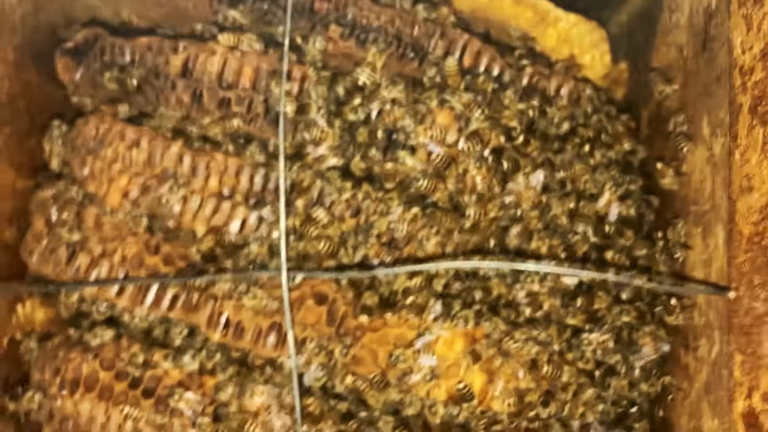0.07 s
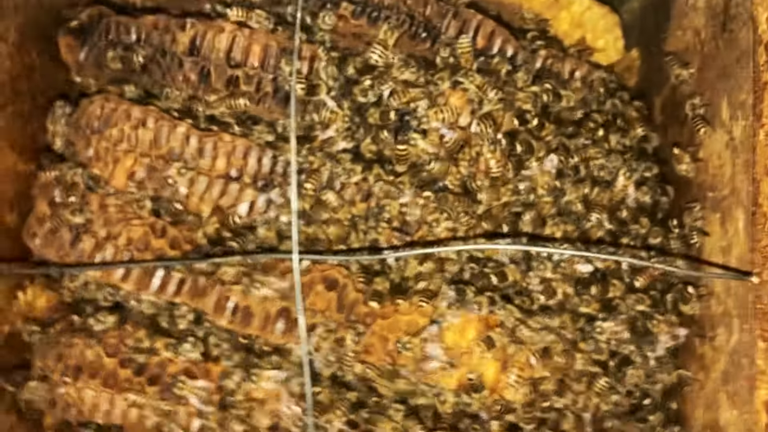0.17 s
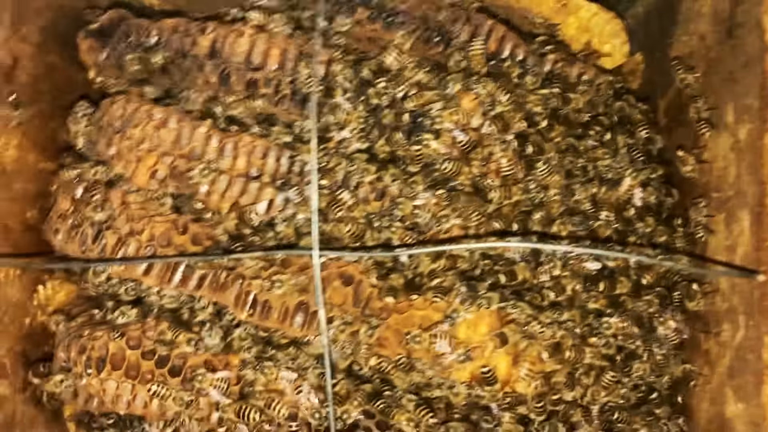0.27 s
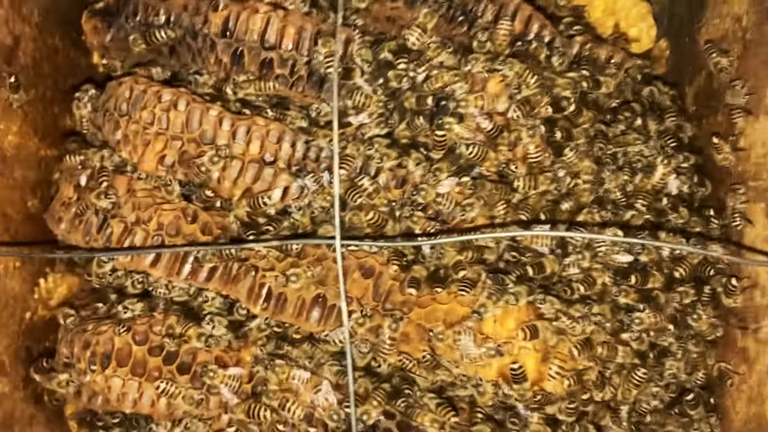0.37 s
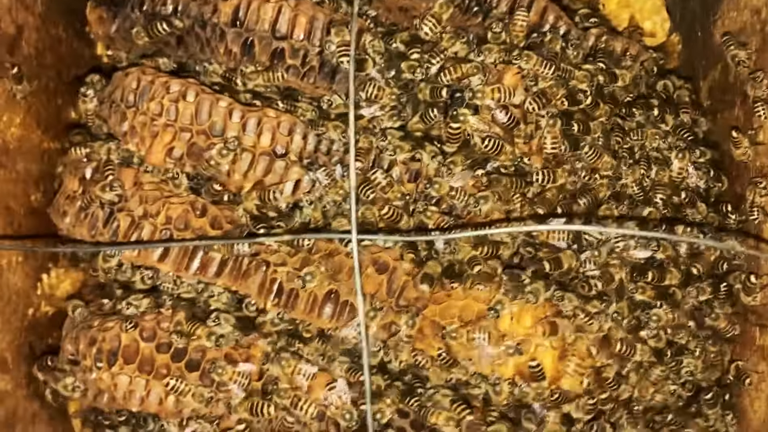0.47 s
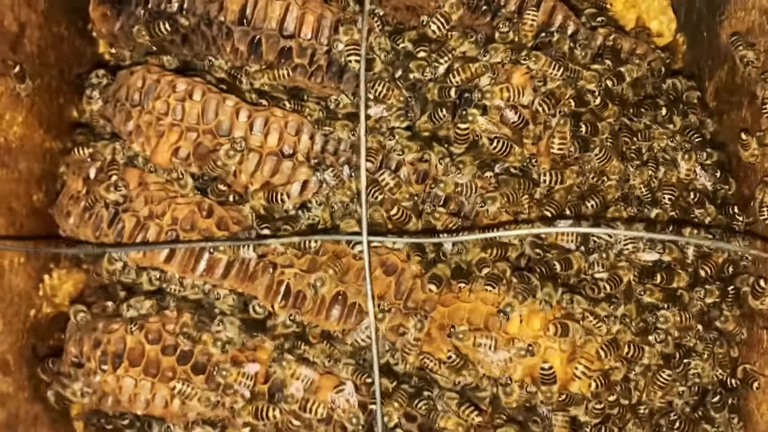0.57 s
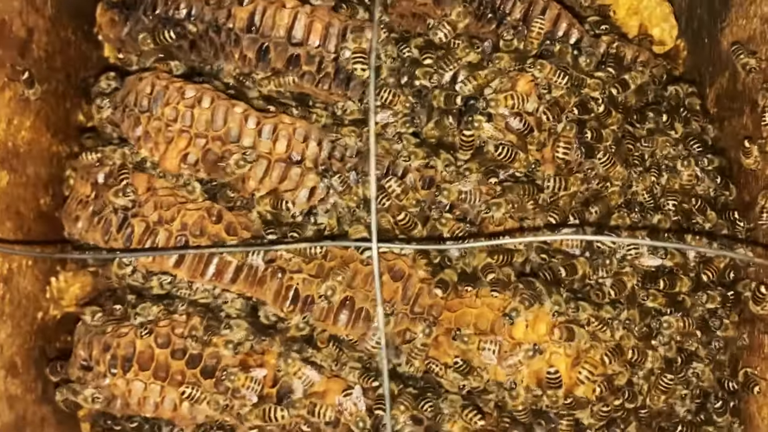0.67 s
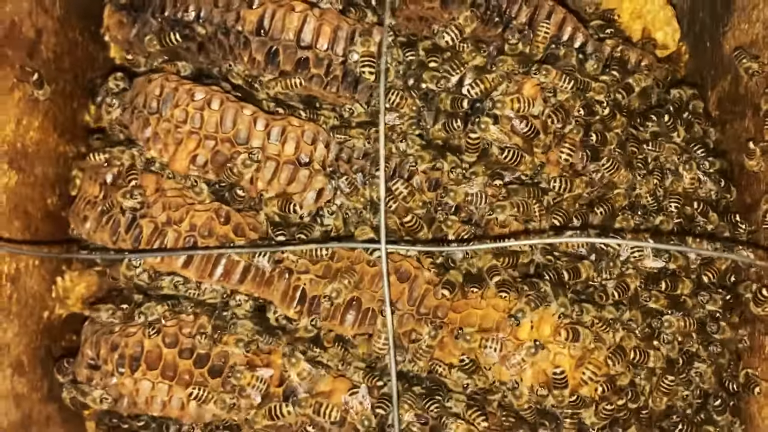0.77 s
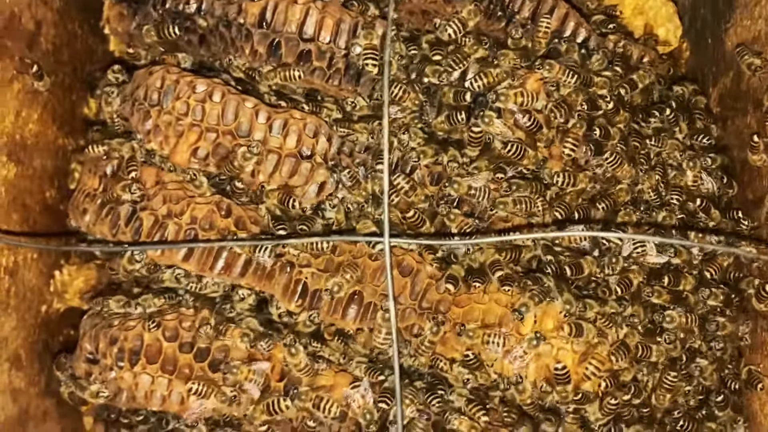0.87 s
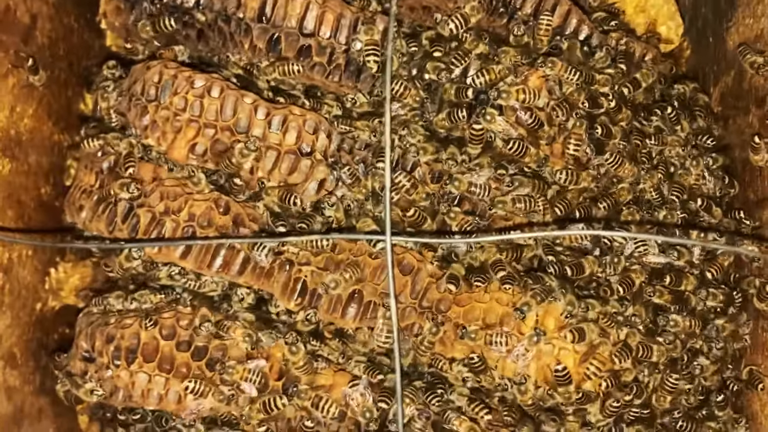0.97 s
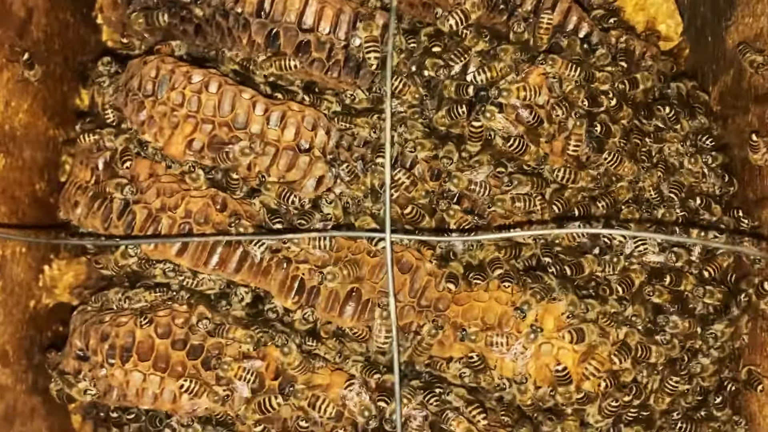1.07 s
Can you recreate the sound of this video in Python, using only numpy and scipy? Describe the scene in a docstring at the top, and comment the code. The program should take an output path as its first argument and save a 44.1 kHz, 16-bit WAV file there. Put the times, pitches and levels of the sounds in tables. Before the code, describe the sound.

Close stereo microphones over an open hive pick up the dense, continuous drone of hundreds of bees on their combs. A low rumble lies underneath and a soft, hissy rustle on top. Individual bees come and go with wavering buzzes, and wings tick lightly against the wax. The colony gradually gets louder, ending with a flurry of small wing rattles and several overlapping buzzes.

```python
"""A bee colony on its combs in an open wooden hive box, heard by a hand-held pair of microphones.
From the start, hundreds of wings beat out of step and make the air in the box hum and whine over a
low rumble, while legs and wings rustle. After about a second, single bees buzz out above the crowd
and wings begin to rattle briefly against the comb. The colony slowly grows louder, and from about
4.4 seconds the rattles crowd together and several bees buzz loudly at once."""
import sys
import numpy as np
from scipy import signal
from scipy.fft import rfft, irfft, next_fast_len
from scipy.io import wavfile
from scipy.ndimage import uniform_filter1d

SR = 44100
rng = np.random.default_rng(int(sys.argv[2]) if len(sys.argv) > 2 else 0)


def file_out(sig):
    """Save sig as 16-bit WAV at sys.argv[1]."""
    # one column per channel
    cols = np.atleast_2d(sig).T
    # limit, then scale
    lim = np.clip(cols, -1, 1)
    pcm = np.round(lim * 32767).astype(np.int16)
    wavfile.write(sys.argv[1], SR, pcm)


N = 251811
FFT_SIZE = next_fast_len(N)
HZ = np.maximum(np.arange(FFT_SIZE // 2 + 1) * SR / FFT_SIZE, 1)
TIME = np.arange(N) / SR


def from_db(db):
    """Turn decibels into a number to multiply by."""
    return 10 ** (np.asarray(db) / 20)


def unit_level(x):
    """Scale a signal to an average power of 1."""
    return x / np.sqrt(np.mean(x ** 2) + 1e-20)


def mono_level(pair):
    """The level of left and right averaged together."""
    return np.sqrt(np.mean(pair.mean(axis=0) ** 2))


def in_time(rows):
    """Join rows that start with a time into one curve for each other column."""
    time_s, *columns = np.transpose(rows)
    return [np.interp(TIME, time_s, column) for column in columns]


def gain_at_hz(points):
    """Join (pitch_hz, level_db) points into a gain for every frequency."""
    hz, db = np.transpose(points)
    return from_db(np.interp(np.log(HZ), np.log(hz), db, left=-90))


def filtered(x, response):
    """Give each frequency of a sound its own gain and delay."""
    return irfft(rfft(x, FFT_SIZE) * response, FFT_SIZE)[..., :N]


def drift(rate_hz):
    """A smooth random wobble of about 1 either way; a higher rate wobbles faster."""
    steps = rng.standard_normal(int(TIME[-1] * 60) + 200)
    memory = np.exp(-2 * np.pi * rate_hz / 60)
    smooth = signal.lfilter([1], [1, -2 * memory, memory * memory], steps)[100:]
    return np.interp(TIME * 60, np.arange(len(smooth)), unit_level(smooth))


def partly_alike(pair, likeness):
    """The right microphone shares only part of what the left one hears."""
    return np.array([pair[0], likeness * pair[0] + np.sqrt(1 - likeness ** 2) * pair[1]])


def from_one_side(pair, lag_ms=0.23, in_step_hz=11320):
    """Treble from one side is mostly alike at both microphones and reaches the left one later."""
    phase = np.pi * (HZ - in_step_hz) * lag_ms / 1000
    return filtered(partly_alike(pair, 0.9), np.exp(1j * np.outer([-1, 1], phase)))


def resonate(pair, resonances, level_db, left_lead_rad):
    """The hive answers most strongly near its resonances, the pitches it naturally rings at."""
    power = np.zeros((2, len(HZ)))
    for pitch_hz, width_hz, db, pan_db in resonances:
        peak = 1 / (1 + ((HZ - pitch_hz) / (width_hz / 2)) ** 2 / 2) ** 2
        power += peak * from_db([[2 * db + pan_db], [2 * db - pan_db]])
    hum = filtered(pair, np.sqrt(power) * np.exp([[.5j * left_lead_rad], [-.5j * left_lead_rad]]))
    return from_db(level_db) * hum / mono_level(hum)


def swarm(count, beat_hz=205, spread=.12, wander=.025, uneven=.6, nearness_db=4.5):
    """Each wing beat is a puff of air; every bee has its own wandering pace, distance and strength."""
    beats = int(N / SR * 420)  # more than enough to fill the scene
    steps = rng.standard_normal((2, count, beats))
    pace, nearness = unit_level(signal.lfilter([1], [1, -1.96, .9604], steps))
    rate_hz = beat_hz * np.exp(spread * rng.standard_normal((count, 1)) + wander * pace)
    at_sample = (np.cumsum(1 / rate_hz, axis=1) - 1 - rng.random((count, 1)) / 50) * SR
    puffs = from_db(nearness_db * nearness) * (1 + uneven * rng.standard_normal((count, beats)))
    inside = (at_sample >= 0) & (at_sample < N)
    pressure = np.bincount(at_sample[inside].astype(int), puffs[inside], N)
    return unit_level(pressure - uniform_filter1d(pressure, size=1500))  # keep only the quick changes


def two_swarms(count):
    """Two separate crowds of bees, each `count` strong."""
    return np.array([swarm(count), swarm(count)])


def deep_rumble(level_db):
    """The trembling mass of bees shakes box and combs without a beat of its own."""
    # Low resonances of box and combs: pitch_hz, width_hz, level_db, left_over_right_db
    resonances = [(52.3, 6.2, -12, 2), (71, 22, -3.5, -3.5), (97, 16, 2.5, 0), (114, 14, 0, 2),
                  (138, 32, -4.5, 6)]
    trembling = partly_alike(rng.standard_normal((2, N)), .985)
    return resonate(trembling, resonances, level_db, left_lead_rad=-.2)


def gliding_hiss(centre_hz, width_hz):
    """A band of hiss whose middle follows a gliding pitch."""
    noise = rng.standard_normal((2, 2, N))[..., :len(centre_hz)]
    slow = signal.sosfilt(signal.butter(2, width_hz / 2, fs=SR, output="sos"), noise)
    phase = 2 * np.pi * np.cumsum(centre_hz) / SR
    return unit_level(partly_alike(slow[0] * np.cos(phase) + slow[1] * np.sin(phase), 0.31))


def bright_hiss(sink_hz_per_s=260, fade_db_per_s=1.25, rise_hz_per_s=80):
    """A bright band of hiss sinks and fades while thin whistles creep upward around it."""
    # Thin whistling streaks of hiss: start_s, length_s, first_pitch_hz, level_db
    whistles = [(0, 0.9, 7440, -64.5), (0.5, 0.8, 7620, -68), (-0.5, 0.58, 6200, -69),
                (0.95, 0.5, 7270, -62), (1.55, 0.8, 7240, -63.5), (0, 0.7, 7200, -66), (0, 0.45, 6760, -69),
                (1.9, 0.45, 7330, -65), (1.3, 1.2, 5950, -70.5), (1.297, 1.3, 6400, -72),
                (2.1, 0.5, 6800, -65), (2.8, 0.4, 6380, -64), (2.5, 0.52, 6500, -63),
                (3, 0.55, 7000, -64.5), (3.5, 0.46, 5560, -67), (4, 1, 6340, -62), (4.45, 1.3, 6040, -66),
                (4.3, 0.9, 6540, -65)]
    band = gliding_hiss(7500 - sink_hz_per_s * TIME, width_hz=800)
    out = from_db(-58.5 - fade_db_per_s * TIME) * band
    for start_s, length_s, first_hz, db in whistles:
        on = (TIME >= start_s) & (TIME < start_s + length_s)
        t = TIME[on] - start_s
        fade = np.clip(np.minimum(t, length_s - t) / 0.16 + 0.16, 0, 1)
        gain = from_db(db + 2.7 * drift(9.9)[on]) * fade
        out[:, on] += gain * gliding_hiss(first_hz + rise_hz_per_s * t, width_hz=60)
    return out * from_db([[-1.5], [1.5]])  # louder on the right


def rustle(patch_hz=1500):
    """Countless touches of legs and wings merge into a hiss that flickers in patches of pitch."""
    # Tone colour of the rustle: pitch_hz, level_db
    colour = [(4000, -20), (6000, -7), (7500, -2), (9000, 0), (12000, 0), (15500, -1)]
    # Loudness of the rustle: time_s, level_db
    loudness = [(0, -59), (0.45, -56), (0.9, -59), (1.5, -57), (2.2, -56.5), (2.5, -57), (2.6, -54),
                (2.7, -55.5), (2.95, -53.5), (3.2, -54.5), (4.2, -54.5), (4.5, -53), (4.9, -53.5),
                (5.71, -51.5)]
    (level_db,) = in_time(loudness)
    spectrum = rfft(rng.standard_normal((2, N)), FFT_SIZE) * gain_at_hz(colour)
    shared_flicker_db = 1.04 * drift(25)
    hiss = np.zeros((2, N))
    for centre_hz in np.arange(4000, 17000, patch_hz):
        band = np.cos(np.pi / 2 * np.clip((HZ - centre_hz) / patch_hz, -1, 1)) ** 2
        patch = irfft(spectrum * band, FFT_SIZE)[:, :N]
        hiss += patch * from_db(shared_flicker_db + 1.9 * drift(5.2))
    heard = from_one_side(hiss)
    return from_db(level_db) * heard / mono_level(heard)


def wing_rattles(typical_beat_hz=180, swell_s=0.02, fade_s=0.015):
    """A wing ticks against the comb once a beat, mixed with hiss; hissier rattles swell more slowly."""
    # Wings touching the comb: start_s, length_s, level_db, pitch_hz, tick_share (0 hiss to 1 ticks)
    rattles = [(1.058, .035, -56, 7400, .2), (1.13, .02, -57, 5600, .4), (1.516, .004, -55, 11600, .8),
               (2.061, .004, -56, 10500, .8), (2.258, .004, -57, 11100, .8), (2.545, .035, -55, 11200, .6),
               (2.597, .05, -51, 10700, .75), (2.765, .022, -53, 11300, .6), (2.96, .018, -49.5, 14800, .5),
               (3.0, .022, -48.5, 14400, .55), (3.543, .047, -57, 11700, .3), (3.599, .004, -55, 11500, .8),
               (4.4, .045, -52, 11800, .45), (4.462, .06, -50, 12000, .45), (4.472, .089, -56, 7100, .2),
               (4.585, .045, -53, 11700, .3), (4.668, .1, -52, 11700, .25), (4.72, .16, -52, 14600, .2),
               (4.79, .09, -55, 11800, .25), (4.898, .025, -53, 13100, .3), (5.223, .052, -52, 10400, .75),
               (5.29, .02, -54, 12500, .3)]
    beat_rates_hz = typical_beat_hz * np.exp(.04 * rng.standard_normal(len(rattles)))
    out = np.zeros((2, N))
    for (start_s, length_s, db, pitch_hz, tick_share), beat_hz in zip(rattles, beat_rates_hz):
        t = np.arange(int((length_s + fade_s) * SR)) / SR
        swell = np.clip(np.minimum(t / swell_s + tick_share, (length_s - t) / fade_s + 1), 0, 1)
        beat = (t * beat_hz).astype(int)
        strength = from_db(3 * rng.standard_normal((2, 60))[:, beat])
        ticks = (np.diff(beat, prepend=-1) > 0) * strength
        hiss = rng.standard_normal((2, 9000))[:, :len(t)]
        width_octaves = 0.24 * pitch_hz / 12000
        edges_hz = pitch_hz * 2 ** (width_octaves * np.array([-.5, .5]))
        band = signal.butter(2, edges_hz, "band", fs=SR, output="sos")
        burst = signal.sosfilt(band, tick_share * unit_level(ticks) + (1 - tick_share) * hiss)
        out[:, round(start_s * SR):][:, :len(t)] += from_db(db) * swell * unit_level(burst)
    return from_one_side(out)


def box_whine():
    """The crowd's wings stir the two highest resonances of the box into a thin whine."""
    # High resonances of the box: pitch_hz, width_hz, level_db, left_over_right_db
    resonances = [(1692, 80, 0.5, 0), (1856, 66, -7.5, -7.5)]
    # Loudness of the whine, which opens up as the microphones come near: time_s, level_db
    loudness = [(0, -67), (0.5, -62), (1.1, -59.5), (1.9, -58.5), (2.3, -58.5), (2.8, -60.5), (3.6, -60),
                (4.4, -59.5), (5.2, -56.5), (5.71, -57)]
    (level_db,) = in_time(loudness)
    return resonate(partly_alike(two_swarms(count=150), .95), resonances, level_db, left_lead_rad=.37)


def near_wings(level_db):
    """Bees close to one microphone are heard by that microphone alone."""
    # Tone colour of close wings: pitch_hz, level_db
    colour = [(250, -14), (500, 15.5), (900, 7), (1400, 4.5), (2000, 3.5), (2400, 3), (3000, -0.5),
              (4000, 2), (5200, -0.5), (7000, -4), (9000, -38)]
    # Lean to the left: pitch_hz, left_up_right_down_db
    lean = [(250, 3.5), (1500, 2), (3000, 2), (5500, 0.5), (9000, 1)]
    crowds = two_swarms(count=120)
    response = gain_at_hz(colour) * gain_at_hz(lean) ** np.array([[1], [-1]]) * (HZ > 200)
    upper_buzz = filtered(crowds, response * (HZ > 1900) * (HZ < 5200))  # level_db sets this band
    crawling = from_db(0.6 * np.array([drift(7.5), drift(6.4)]))  # bees come nearer and go
    return from_db(level_db) * crawling * filtered(crowds, response) / mono_level(upper_buzz)


def single_bees(fade_s=0.077):
    """A few bees stand out, each with a wing tone that wavers in pitch and strength."""
    # One row a bee: brightness_db_per_octave, path of (time_s, wing_beat_hz, level_db)
    bees = [(2, [(-0.1, 213, -60), (0.25, 213, -60), (0.5, 218, -59), (0.8, 215, -58), (1.1, 216, -59),
            (1.4, 216, -58), (1.55, 212, -64)]), (2, [(2.4, 189, -62), (2.6, 187, -57), (3.0, 188, -57),
            (3.4, 186, -55), (3.9, 183, -55), (4.25, 182, -60)]), (3, [(2.55, 206, -64), (2.8, 211, -58),
            (3.0, 207, -58), (3.3, 208, -56), (3.7, 209, -59), (4.2, 208, -60), (4.4, 209, -64)]),
            (3, [(2.95, 222, -64), (3.25, 220, -59), (3.6, 220, -60), (4.0, 218, -60), (4.2, 222, -64)]),
            (-25, [(1.0, 254, -62), (1.15, 256, -48.5), (1.6, 255, -46.5), (1.75, 240, -58)]),
            (-1.5, [(1.44, 232, -66), (1.52, 240, -50), (1.64, 244, -49.5), (1.78, 226, -48.5),
            (1.9, 214, -48.5), (2.15, 213, -50), (2.36, 207, -49), (2.46, 200, -56)]),
            (5, [(4.33, 222, -62), (4.45, 231, -55), (4.56, 238, -53), (4.75, 226, -58)]),
            (-3, [(4.38, 184, -60), (4.52, 189, -46), (4.68, 188, -49.5), (4.85, 184, -52), (5.0, 190, -50),
            (5.3, 187, -46.5), (5.55, 182, -48.5), (5.71, 178, -53)]), (-2.5, [(4.68, 208, -58),
            (4.82, 212, -44.5), (5.05, 222, -48), (5.2, 226, -50), (5.35, 232, -55), (5.55, 222, -60)]),
            (4, [(4.92, 259, -66), (5.08, 267, -56), (5.25, 262, -64)]), (3.5, [(5.15, 292, -62),
            (5.25, 287, -57), (5.42, 275, -61), (5.71, 266, -58)])]
    # The pure tones in one wing buzz: multiple_of_beat, level_db
    harmonics = [(1, -3), (2, 0), (3, -15), (4, -5), (5, -11), (8, -19)]
    out = np.zeros(N)
    for brightness, path in bees:
        beat_hz, level_db = in_time(path)
        phase = 2 * np.pi * np.cumsum(beat_hz * (1 + .006 * drift(12))) / SR
        buzz = np.zeros(N)
        for multiple, db in harmonics:
            strength = from_db(db + brightness * np.log2(multiple) + 3 * drift(8))
            buzz += strength * np.sin(multiple * phase)
        start_s, end_s = path[0][0], path[-1][0]
        fade = np.clip(np.minimum(TIME - start_s, end_s - TIME) / fade_s + .5, 0, 1)
        out += from_db(level_db) * fade * unit_level(buzz)
    return out * from_db([[1.5], [-1.5]])  # louder on the left


def box_hum(level_db):
    """The wings of the whole colony make the air in the box ring."""
    # Resonances of the air in the box: pitch_hz, width_hz, level_db, left_over_right_db
    resonances = [(176.3, 40, -1.5, 3.5), (266, 50.5, -4, 5.5), (352.7, 34.6, -4, 6.5), (407, 24, -6.5, 7),
                  (434, 16, -16, 6), (740, 40, -23, 9.5), (865, 105, -21, 6), (1075, 114, -22.5, 7),
                  (1209, 55, -26.5, -4.5)]
    return resonate(partly_alike(two_swarms(count=110), .95), resonances, level_db, left_lead_rad=.5)


def scene():
    """Add up the hive; rumble, hum and near wings grow as the colony gets stirred up."""
    # How stirred up the colony is: time_s, above_calm_db
    stir = [(0, -0.5), (0.3, 0), (1.4, -0.2), (1.6, 0.5), (2.6, 1.5), (4.4, 2.5), (4.6, 3.5), (5.71, 4)]
    (stir_db,) = in_time(stir)
    treble = rustle() + wing_rattles() + bright_hiss()
    rumble = deep_rumble(level_db=-36 + 0.31 * stir_db)
    hum = box_hum(level_db=-38.5 + stir_db)
    close_buzz = near_wings(level_db=-61 + 1.09 * stir_db)
    return treble + rumble + hum + close_buzz + box_whine() + single_bees()


def record(dry, bass_cut_hz=36, top_cut_hz=15750):
    """The microphones drop the lowest bass, and the highest treble is cut steeply."""
    thinned = signal.sosfilt(signal.butter(6, bass_cut_hz, "high", fs=SR, output="sos"), dry)
    return signal.sosfilt(signal.ellip(14, .3, 70, top_cut_hz, fs=SR, output="sos"), thinned)


dry = scene()
out = record(dry)
file_out(out)
```